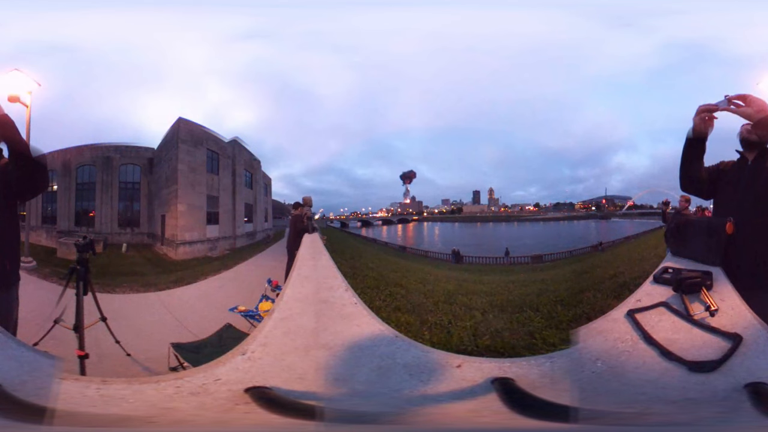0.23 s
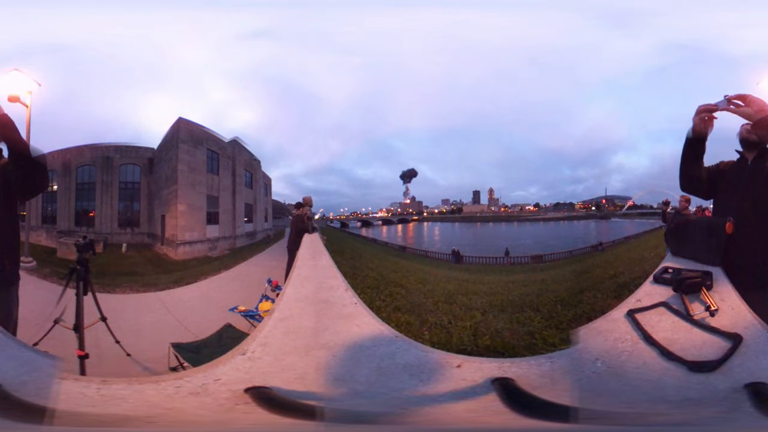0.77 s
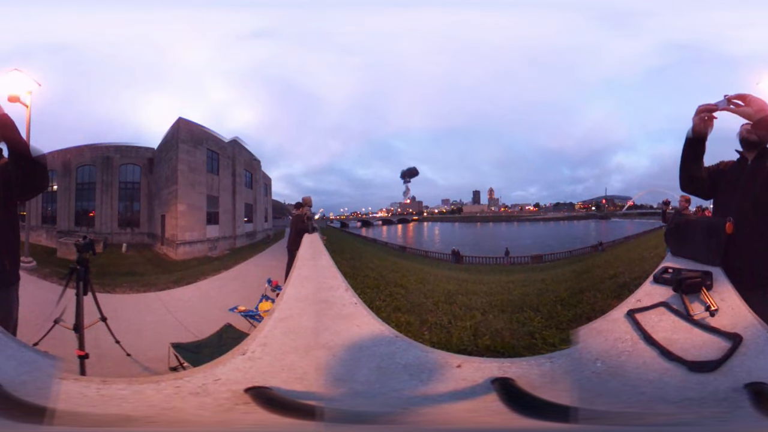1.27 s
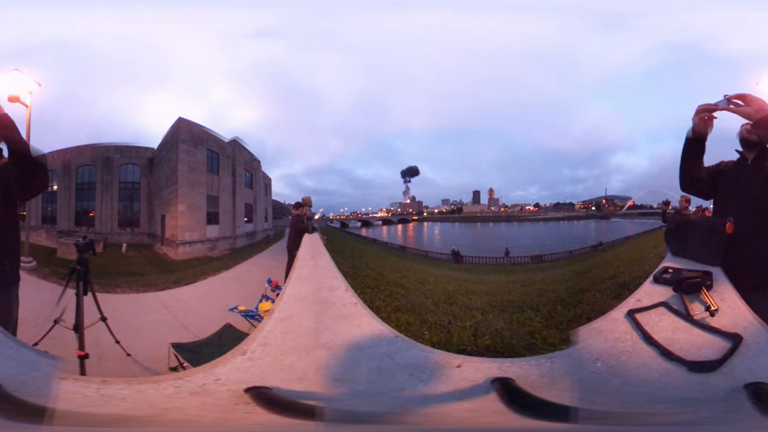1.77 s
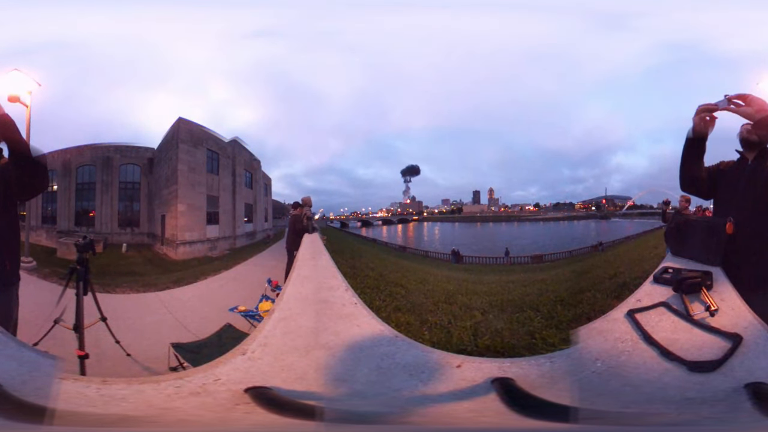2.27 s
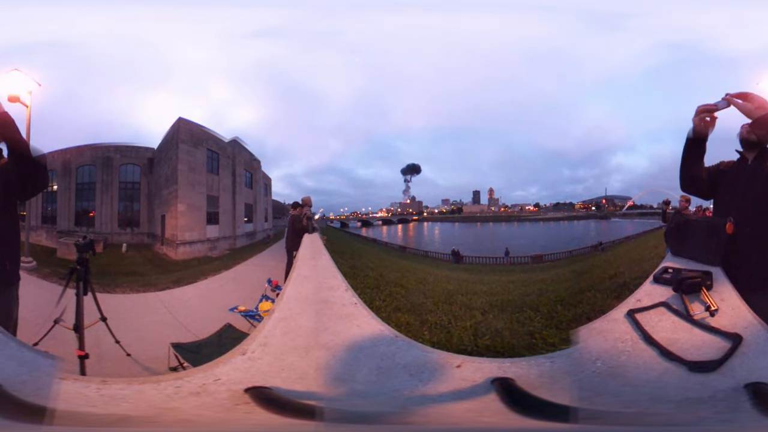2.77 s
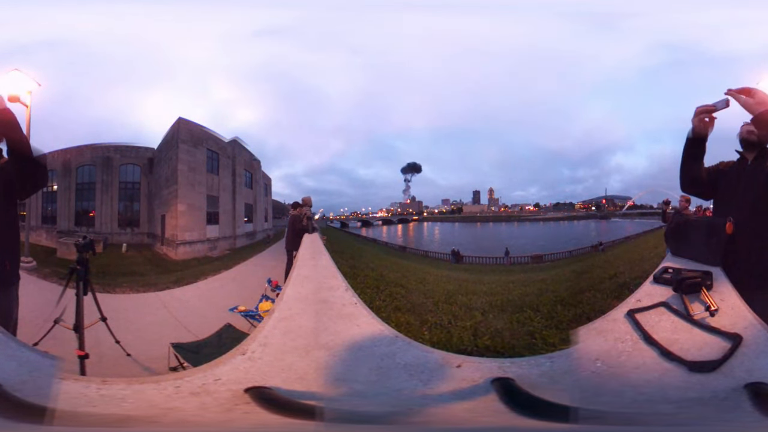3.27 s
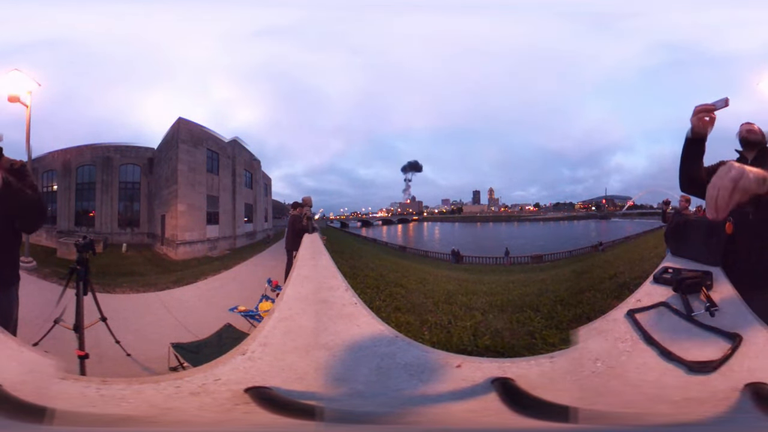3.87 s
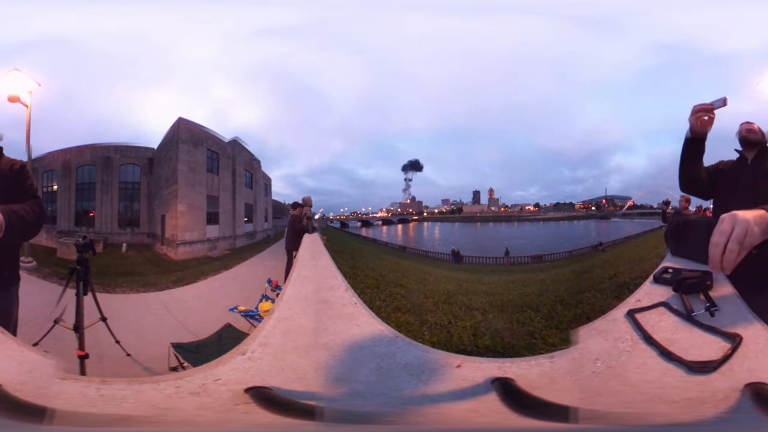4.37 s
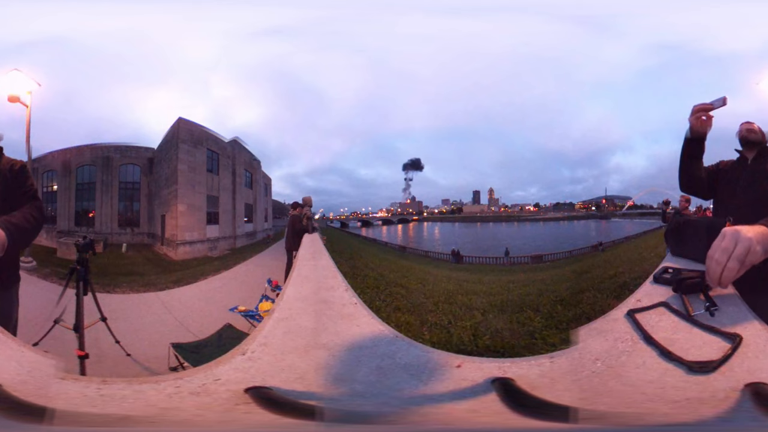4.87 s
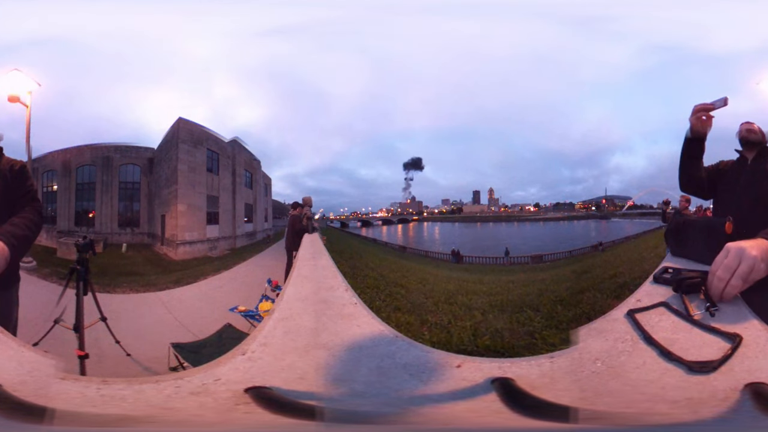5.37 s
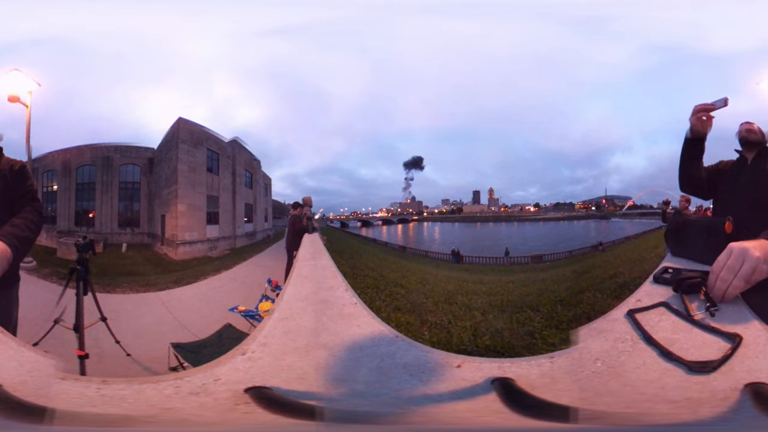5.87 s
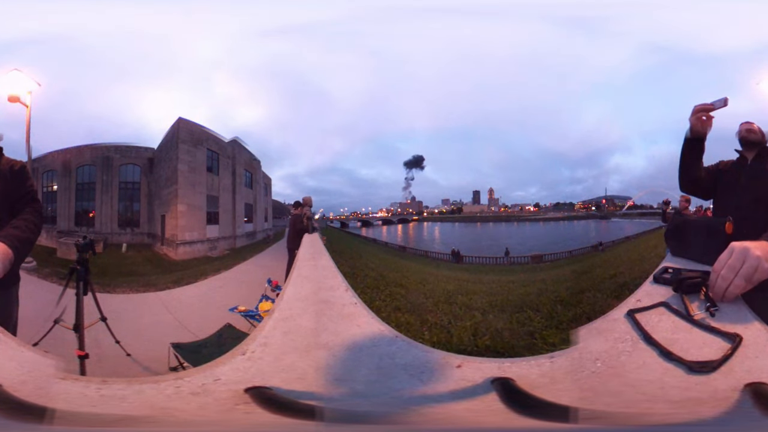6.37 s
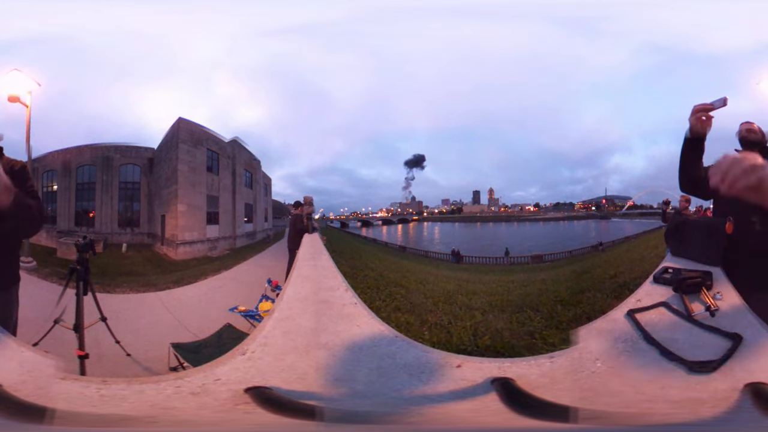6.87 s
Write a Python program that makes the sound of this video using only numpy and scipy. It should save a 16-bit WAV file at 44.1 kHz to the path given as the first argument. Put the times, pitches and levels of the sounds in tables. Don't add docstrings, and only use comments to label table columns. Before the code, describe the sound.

Across open water, the rumble of an earlier blast is already rolling. Two single charges follow about a second apart, each a hard crack and deep boom with slapping wall echoes. Then a string of cracks breaks into the sustained roar of falling masonry, with a heavy late blast near the end. A small outdoor microphone overloads, flattening the loud peaks.

```python
import sys
import numpy as np
from scipy import signal
from scipy.fft import rfft, irfft, next_fast_len
from scipy.io import wavfile
from scipy.ndimage import uniform_filter1d, map_coordinates

SR = 44100
rng = np.random.default_rng(int(sys.argv[2]) if len(sys.argv) > 2 else 0)


def how_loud(loudness_db):
    steps = np.asarray(loudness_db, float) / 20
    return 10 ** steps


def dump(signal):
    limited = np.clip(np.atleast_2d(signal).T, -1, 1)
    pcm = np.round(limited * 32767).astype(np.int16)
    wavfile.write(sys.argv[1], SR, pcm)


N = 314430
MAIN_S = 4.1594

# start_s, overpressure_db, swing_hz, life_ms, scatter_db
DIRECT_FRONTS = [
    (0.7438, 16, 70.7, 5.2, -12),
    (1.8647, 13, 52.9, 6.2, -23),
    (6.3946, 16, 75, 9, 0),
    (6.4438, 7, 60, 10, -9.5),
    (7.0957, 3.5, 72.6, 41, -10),
]
# start_s, peak_db, smear_ms, thud_db
WALL_SLAPS = [(0.17, -43, 12, -45), (0.297, -42, 5.5, -39), (0.4827, -34, 5.8, -40), (0.6, -37, 19, -32),
              (0.889, -39, 30, -31), (1.0311, -29, 7.5, -22.5), (1.27, -45, 12, -25),
              (1.5929, -32, 10, -22.5), (1.701, -38, 3.1, -45), (1.7157, -35, 5.9, -46),
              (1.7393, -36, 6, -43), (2.1241, -28.5, 14, -17), (2.364, -60.5, 12, -19.5),
              (2.46, -55, 9.4, -23), (2.684, -39, 8.5, -24), (2.796, -35, 3.1, -37),
              (2.869, -40.5, 26, -46), (3.001, -46, 51, -32), (3.469, -60, 12, -36), (3.7, -69, 11, -34),
              (4.0348, -47, 63, -36)]
# start_s, peak_db, smear_ms, thud_db
FLOOR_CRACKS = [(4.1888, -37, 6.3, 1), (4.2078, -30.5, 44, -16), (4.333, -25, 15, -16),
                (4.565, -25, 27, -3.5), (4.6713, -29.5, 21, -12), (4.7932, -18, 36, 7),
                (4.8299, -17, 25, -9.5), (4.8642, -11, 3.8, -0.5), (4.9435, -21.5, 86, 1),
                (5.0337, -15, 29, -7.5), (5.0952, -17.5, 6.6, 3.5), (5.1402, -15, 16, -9.5),
                (5.2041, -20, 7.3, -12.5), (5.331, -16, 3.8, 3.5), (5.362, -14, 9.5, -18),
                (5.3962, -19.5, 6.8, -18), (5.446, -33, 18, -15.5), (5.4792, -14.5, 6.6, -24.5),
                (5.674, -13.5, 6, 3), (5.829, -24.5, 21, -3.5), (5.948, -16.5, 3.1, -14),
                (5.9997, -11.5, 7.6, -3.5), (6.23, -22, 6, -24.5), (6.3347, -21, 26, -7.5),
                (6.4109, -8.5, 7.1, -1.5), (6.4694, -19, 3.7, -12.5), (6.572, -18, 3.3, -18),
                (6.6566, -18.5, 2.9, -2), (6.9154, -27.5, 6.5, -13), (7.0, -22, 50, -17.5)]
# start_s, near_echo_db, far_echo_db
ROLLING_CHARGES = [
    (-.37, -6, -17.5),
    (0.7427, -5.5, -19.5),
    (1.863, -4.5, -21),
]


def unit(x):
    return x / np.sqrt(np.mean(x ** 2) + 1e-20)


def wobble(rate):
    knots = rng.standard_normal(int(N * rate / SR) + 4)
    return map_coordinates(knots, [np.arange(N) * rate / SR])


def filtered(x, response):
    m = next_fast_len(N + SR // 2)
    return irfft(rfft(x, m) * response(np.fft.rfftfreq(m, 1 / SR)), m)[:N]


def add(track, s, wave):
    part = track[round(s * SR):][:len(wave)]
    part += wave[:len(part)]


def scattered(spectrum, spread_db, clump_db, clump_rate):
    sizes_db = spread_db * np.minimum(rng.exponential(size=N), 5) + clump_db * wobble(clump_rate)
    grains = how_loud(sizes_db) * rng.standard_normal(N)
    f, db = np.transpose(spectrum)
    return unit(filtered(grains, lambda hz: how_loud(np.interp(np.log(hz + 1), np.log(f), db))))


def dying(s, db, t60):
    since = np.arange(N) / SR - s
    fade_db = 60 * np.abs(since) / np.reshape(t60, (-1, 1))
    return (since >= 0) * how_loud(np.reshape(db, (-1, 1)) - fade_db) ** 2


def echo_power():
    town_db = [-45, -48.5, -66.5, -97.5]
    # level_db against the roll, then decay t60_s, for near and far echoes
    near_layers_db = [1.1, -9.5, -28.5, -40.5]
    near_t60_s = [0.54, 0.46, 0.9, 0.63]
    far_layers_db = [0.64, -12, -24.5, -35]
    far_t60_s = [5.3, 6.63, 6.2, 1.9]
    # tail of a direct front, level_db against its scatter, then decay t60_s
    tail_db = [-37.5, -9, -28, -29.5]
    tail_t60_s = [.3, 0.71, 0.91, 0.54]
    power = how_loud(town_db)[:, None] ** 2
    for s, near_db, far_db in ROLLING_CHARGES:
        power = power + dying(s, np.add(near_db, near_layers_db), near_t60_s)
        power = power + dying(s, np.add(far_db, far_layers_db), far_t60_s)
    for s, *_, scatter_db in DIRECT_FRONTS:
        power = power + dying(s, np.add(scatter_db, tail_db), tail_t60_s)
    return power


def swell_power():
    # level_db (boom against thud, others against peak), then decay t60_s
    swell_db = [2.7, -2.5, -20.5, -35]
    swell_t60_s = [0.22, .4, 0.65, 0.56]
    swell, t = np.zeros((4, N)), np.arange(SR // 3) / SR
    for s, peak_db, _, thud_db in WALL_SLAPS + FLOOR_CRACKS:
        levels_db = np.add([thud_db, peak_db, peak_db, peak_db], swell_db)
        for layer, level_db, t60 in zip(swell, levels_db, swell_t60_s):
            add(layer, s, how_loud(level_db - 60 * t / t60) ** 2)
    return np.abs(uniform_filter1d(swell, size=400, origin=199))


def collapse_power():
    # time_s, force_db
    force_curve = [
        (4.17, -36),
        (4.33, -26.5),
        (4.45, -38),
        (4.6, -27),
        (4.9, -20.5),
        (5.55, -26.5),
        (6.0, -25.5),
        (6.45, -25.5),
        (6.88, -30),
    ]
    # level_db at mean force, then share of the force swing followed
    fall_db = [-7.5, -24, -36.5, -59.5]
    force_share = [.8, 0.38, 0.57, 1.2]
    s, force_db = np.transpose(force_curve)
    swing_db = np.interp(np.arange(N) / SR, s, force_db) - np.mean(force_db)
    falling = np.arange(N) / SR >= MAIN_S
    return falling * how_loud(np.array(fall_db)[:, None] + np.outer(force_share, swing_db)) ** 2


def roll():
    # pitch_hz, density_db (dB per Hz)
    boom_colour = [(8.8, -33.5), (15, 1), (43, 4.5), (65, 3), (119, 0), (221, -14), (261, -25.5),
                   (320, -16.5), (420, -32.5), (700, -120)]
    # pitch_hz, density_db (dB per Hz)
    fall_colour = [(9, -58), (16, -8), (25, 0), (33, 5), (48, -4), (63, 3.5), (80, -7.5), (125, -5.5),
                   (190, -19.5), (320, -25), (420, -46), (700, -120)]
    # pitch_hz, density_db (dB per Hz)
    roar_colour = [(88, -22.5), (150, -3.5), (302, -10), (496, -7.5), (728, -15), (784, -17.5),
                   (1400, -28.5), (1820, -59.5), (3080, -120)]
    # pitch_hz, density_db (dB per Hz)
    crackle_colour = [(500, -2.5), (800, -3), (1300, -3), (1900, -7), (2600, -12), (4000, -20.5),
                      (5500, -34), (7500, -39), (9000, -55)]
    # pitch_hz, density_db (dB per Hz)
    sizzle_colour = [(2000, -46.5), (3500, 4.5), (5000, -5.8), (7000, -13), (9000, -38)]
    gains = np.sqrt(echo_power() + collapse_power() + swell_power())
    boom_gain, roar_gain, crackle_gain, sizzle_gain = gains

    starts_s = np.array([s for s, *_ in ROLLING_CHARGES] + [MAIN_S])
    since = np.arange(N) / SR - starts_s[:, None]
    build = np.sum((since >= 0) * np.exp(-np.abs(since) / .018), axis=0)
    peal = wobble(22)

    echo = scattered(boom_colour, spread_db=4.0, clump_db=1.84, clump_rate=9.75)
    fall = scattered(fall_colour, spread_db=2.0, clump_db=0.87, clump_rate=17)
    rumble = np.where(since[-1] < 0, echo, how_loud(1.0) * fall)
    boom = boom_gain * how_loud(-39 * build + 0.69 * peal) * rumble

    roar = scattered(roar_colour, spread_db=2.5, clump_db=1.2, clump_rate=40)
    roar *= roar_gain * how_loud(-12 * build + 1.1 * peal)

    crackle = scattered(crackle_colour, spread_db=2.5, clump_db=1.0, clump_rate=88)
    crackle *= crackle_gain * how_loud(3.0 + 0.46 * peal)

    sizzle = sizzle_gain * scattered(sizzle_colour, spread_db=5.5, clump_db=4.0, clump_rate=17)
    return boom + roar + crackle + sizzle


def blast(phase_ms):
    u = np.arange(SR // 8) / (SR * phase_ms / 1000)
    return (1 - u) * np.exp(-.6 * u)


def slaps():
    clear_ms = 9.5
    air, t = np.zeros(N), np.arange(SR // 10) / SR
    for s, peak_db, smear_ms, _ in WALL_SLAPS + FLOOR_CRACKS:
        spray = 0.11 * rng.standard_normal(len(t)) * np.exp(-1000 * t / smear_ms)
        spray[0] = min(1, clear_ms / smear_ms)
        add(air, s, -how_loud(peak_db + 11.0) * signal.fftconvolve(spray, blast(phase_ms=.65)))
    return filtered(air, lambda hz: 1 / (1 + 1j * hz / 4600) ** 2)


def charges():
    # start_s, overpressure_db, swing_hz, life_ms, scatter_db
    blunt_fronts = [
        (.7575, 1.5, 133, 22, -24.5),
        (.7763, 12.5, 91.6, 2.8, -23.5),
        (1.8955, 0, 50, 11, -29),
        (4.159, 2, 55.7, 21, -35),
        (4.5091, 8, 45.7, 10, -19),
    ]
    scatter_ms = 6.6
    air, t = np.zeros(N), np.arange(SR // 5) / SR
    for fronts, rise_ms in (DIRECT_FRONTS, 0.1), (blunt_fronts, 2.2):
        for s, db, swing_hz, life_ms, hiss_db in fronts:
            wave = np.cos(2 * np.pi * swing_hz * t) * np.exp(-1000 * t / life_ms)
            wave *= 1 - np.exp(-1000 * t / rise_ms)
            hiss = signal.lfilter([.45], [1, -.75], rng.standard_normal(len(t)))
            hiss *= np.exp(-1000 * t / scatter_ms)
            add(air, s, -how_loud(db) * wave + how_loud(hiss_db) * hiss)
    return air


def scene():
    return (roll() + slaps() + charges())[None]


def flatten(x, top, hard):
    return x / (1 + np.abs(x / top) ** hard) ** (1 / hard)


def thin_treble(x, quiet_db, masked_db):
    hz, _, z = signal.stft(x, SR, nperseg=1024)
    band = (hz // 560).astype(int)
    power = np.array([np.mean(np.abs(z[band == b]) ** 2, axis=0) for b in range(band.max() + 1)])
    block = np.arange(power.shape[1]) // 2
    block_starts = np.flatnonzero(np.diff(block, prepend=-1))
    loudest = np.maximum.reduceat(power, block_starts, axis=1)
    masker = uniform_filter1d(loudest[2:5].mean(axis=0), size=3)

    need = how_loud(quiet_db) ** 2 + how_loud(masked_db) ** 2 * masker
    need = need * how_loud(2.7 * rng.standard_normal(loudest.shape))
    need *= how_loud(15 * uniform_filter1d(rng.standard_normal(need.shape[1]), size=3))
    need *= how_loud(3 * (np.arange(len(need))[:, None] - 8))

    block_passes = (loudest > need)[band][:, block]
    burst_passes = (power > 6 * need[:, block])[band]
    keep = block_passes | burst_passes | (hz < 2200)[:, None]
    return signal.istft(z * keep, SR, nperseg=1024)[1][:N]


def top_cut(x):
    return signal.sosfilt(signal.butter(12, 7590, fs=SR, output="sos"), x)


def record(dry):
    flat = flatten(dry[0], top=.705, hard=22)
    narrow = filtered(flat, lambda hz: 1 / (1 + (hz / 7120) ** 30))
    lean = thin_treble(narrow, quiet_db=-91, masked_db=-23)
    shaved = flatten(lean + .004, top=.73, hard=60)
    return top_cut(shaved[None])


dry = scene()
out = record(dry)
dump(out)
```